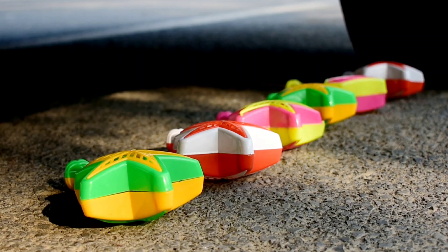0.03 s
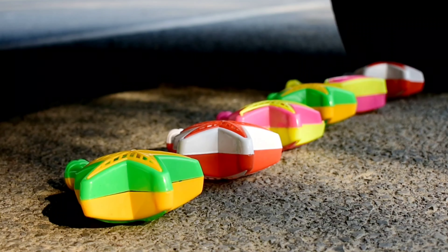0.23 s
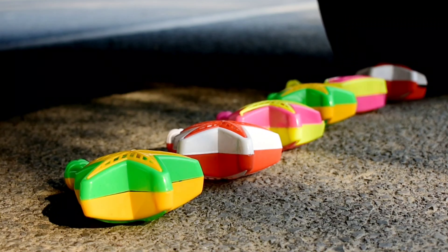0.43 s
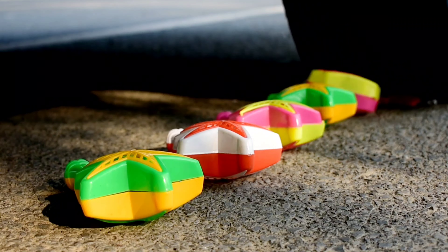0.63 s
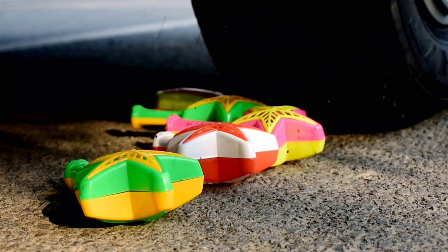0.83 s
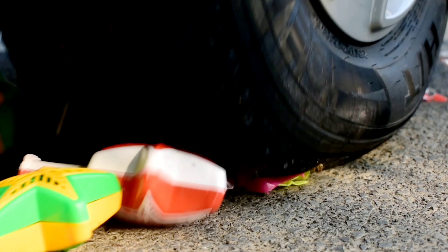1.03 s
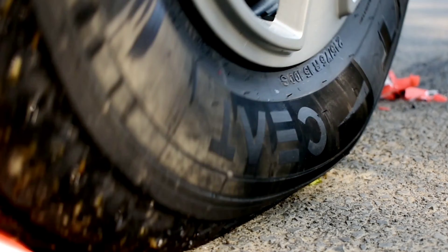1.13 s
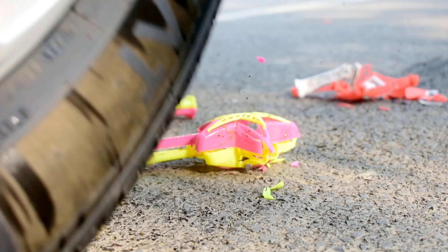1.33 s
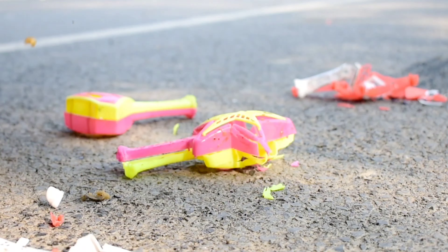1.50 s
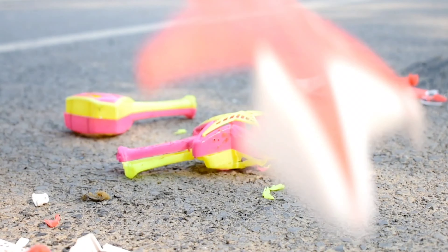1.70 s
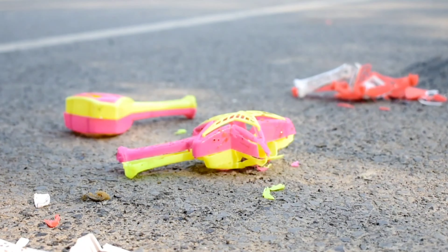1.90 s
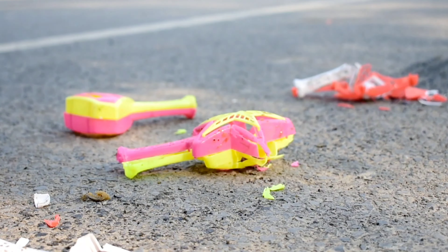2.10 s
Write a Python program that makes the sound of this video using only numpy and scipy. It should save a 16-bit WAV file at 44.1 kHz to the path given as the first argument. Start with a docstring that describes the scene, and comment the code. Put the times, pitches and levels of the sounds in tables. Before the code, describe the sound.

Hollow plastic toys crack and crunch sharply under a slow car tyre on asphalt, very close

```python
"""A car tyre rolls over a row of hollow plastic toy rattles on asphalt, close to the microphone.
Over faint outdoor noise, filtered and faded, the first shell snaps: torn, resonant clicks that crumble away.
Its shards twang and squeak (decaying and gliding sines); grinding ticks and ringing loose bits go on between cracks.
More shells crack, shedding crackling crumbs; later the flattened shells resound, and last the loose bits are jolted.
The road and car add a short diffuse echo; the loudest cracks overload the recorder."""
import sys
import numpy as np
from scipy import signal
from scipy.fft import rfft, irfft, next_fast_len
from scipy.io import wavfile
from scipy.ndimage import map_coordinates

SR = 44100
rng = np.random.default_rng(int(sys.argv[2]) if len(sys.argv) > 2 else 0)


def pcm_store(signal):
    """Save signal as 16-bit PCM."""
    levels = np.round(np.clip(np.atleast_2d(signal), -1, 1) * 32767)
    wavfile.write(sys.argv[1], SR, levels.astype(np.int16).T)


N = 94815


def amp(db):
    """Decibels to gain."""
    return 10 ** (np.asarray(db) / 20)


def unit(x):
    """Scale to rms 1."""
    return x / np.sqrt(np.mean(x ** 2) + 1e-20)


def along(points, hz):
    """Read (hz, value) points on a log frequency axis."""
    point_hz, value = np.transpose(points)
    return np.interp(np.log(hz + 1), np.log(point_hz + 1), value)


def curves(rows):
    """Interpolate each column after the time to one value per sample."""
    time_s, *columns = np.transpose(rows)
    return [np.interp(np.arange(N) / SR, time_s, column) for column in columns]


def seconds(size):
    """Time axis in seconds."""
    return np.arange(size) / SR


def grid(size=4096):
    """Frequencies in Hz, raised by 1 to avoid zero, on which short responses are drawn."""
    return np.fft.rfftfreq(size, 1 / SR) + 1


def causal(gain):
    """Minimum-phase impulse response: the sharpest click with this spectrum."""
    cepstrum = irfft(np.log(np.maximum(gain, 1e-6)))
    cepstrum[1:len(cepstrum) // 2] *= 2
    cepstrum[len(cepstrum) // 2 + 1:] = 0
    return irfft(np.exp(rfft(cepstrum)))


def coloured(x, points):
    """Filter x by a (hz, level_db) spectrum, at rms 1."""
    response = causal(amp(along(points, grid())))
    return unit(signal.fftconvolve(x, response)[:N])


def resonance(hz, q):
    """Spectrum of a broad peak, of unit power."""
    f = grid()
    return unit(1 / (1 + (q * (f / hz - hz / f)) ** 2))


def add(track, start_s, sound):
    """Mix a sound into the track at start_s."""
    part = track[max(round(start_s * SR), 0):][:len(sound)]
    part += sound[:len(part)]


def ticks(per_s):
    """Impulses of random size at random moments, per_s on average."""
    struck = rng.random(N) < per_s / SR
    return struck * rng.standard_normal(N)


def wobble(knots_per_s, size=N):
    """Smooth random curve through evenly spaced knots."""
    knots = rng.standard_normal(int(size * knots_per_s / SR) + 4)
    return map_coordinates(knots, [seconds(size) * knots_per_s])


# outdoor background spectrum: hz, level_db
AIR_SPECTRUM = [(25, -20.5), (220, -2.5), (320, -8), (800, -4.5), (2700, 3.5), (4000, -2), (6400, -26)]
# background level over time, added to AIR_DB: time_s, level_db
AIR_FADE = [(1.6, 2.5), (2.05, -5)]
AIR_DB = -61.5


def air():
    """Faint street noise: filtered Gaussian noise under a slow fade."""
    fade_db, = curves(AIR_FADE)
    return amp(AIR_DB + fade_db) * coloured(rng.standard_normal(N), AIR_SPECTRUM)


STREET_DB, STREET_DELAY_S, STREET_T60_S, STREET_DULL_HZ = -15, 0.0044, 0.1, 5000


def street(x):
    """Scatter off road and car underside: a short, dull tail of decaying noise."""
    t = seconds(SR // 4)
    tail = rng.standard_normal(len(t)) * amp(-60 * t / STREET_T60_S) * (t > STREET_DELAY_S)
    dull = causal(1 / (1 + (grid() / STREET_DULL_HZ) ** 2))
    response = signal.fftconvolve(tail / np.linalg.norm(tail), dull)
    return signal.fftconvolve(x, response)[:N]


# ringing notes of the loose bits: hz, level_db
BIT_NOTES = [(3150, 0), (3440, 6.5), (3560, -1.5), (3720, 0), (4380, -15.5)]
BIT_T60_S, BIT_ATTACK_S, BIT_SWING_DB = 0.039, 0.00086, 3
BIT_SPREAD, BIT_GLIDE_PER_S = 0.08, 1  # shares of the pitch, under full load


def chink(squeeze):
    """One knock of the loose bits, each note at a random strength; squeeze (0-1) scatters and bends the notes."""
    t = seconds(size=4096)
    hz, level_db = np.transpose(BIT_NOTES)[:, :, None]
    strength, detune, bend, turn = rng.standard_normal((4, len(BIT_NOTES), 1))
    hz = hz * (1 + squeeze * (BIT_SPREAD * detune + BIT_GLIDE_PER_S * bend * t))
    notes = amp(level_db + BIT_SWING_DB * strength) * np.sin(2 * np.pi * (hz * t + turn))
    envelope = amp(-60 * t / BIT_T60_S) * (1 - np.exp(-t / BIT_ATTACK_S)) ** 2
    return notes.sum(axis=0) * envelope / np.linalg.norm(amp(level_db))


CHATTER_PER_S = 190


def chatter(load):
    """Loose bits knock about at uneven moments, squeezed by the load (0-1)."""
    out = np.zeros(N)
    for slot, (when, size) in enumerate(rng.random((int(CHATTER_PER_S * N / SR), 2))):
        start_s = (slot + when) / CHATTER_PER_S
        squeeze = load[min(int(start_s * SR), N - 1)]
        add(out, start_s, (.5 + size) * chink(squeeze))
    return unit(out)


# pieces under the tread, before the trims below: time_s, grind_db, chatter_db
CRUSH = [(.28, -52.5, -38), (.36, -49.5, -44), (.41, -35, -30), (.53, -42, -31.5), (.58, -38, -27.5),
         (.625, -45, -38.5), (.66, -32.5, -32), (.74, -44, -40), (.8, -55.5, -42.5), (.94, -49, -45),
         (.985, -32.5, -34), (1.08, -50.5, -39), (1.17, -34, -42.5), (1.56, -46.5, -39.5), (1.72, -54, -44),
         (2.15, -73, -47.5)]
# grinding spectrum: hz, level_db
GRIND_SPECTRUM = [(300, -32.5), (1300, -18), (1750, -0.5), (3000, 0), (4300, -3), (5600, -16), (8000, -38)]
FIRST_BREAK_S, CRUSH_RISE_S = 0.19, .08
GRIND_TRIM_DB, GRIND_PER_S, CHATTER_TRIM_DB = -0.5, 1500, 1


def crushing():
    """The tread grinds pieces (dense filtered ticks) and the loose bits chatter between the cracks."""
    grind_db, chatter_db = curves(CRUSH)
    load = amp(grind_db - grind_db.max())
    begun = np.clip((seconds(N) - FIRST_BREAK_S) / CRUSH_RISE_S, 0, 1)
    grind = amp(grind_db + GRIND_TRIM_DB) * coloured(ticks(GRIND_PER_S), GRIND_SPECTRUM)
    return begun * (grind + amp(chatter_db + CHATTER_TRIM_DB) * chatter(load))


# loose bits jolted: start_s, level_db
JOLTS = [(0.427, -23), (1.435, -23.5), (1.614, -23), (1.926, -32), (2.065, -27.5), (2.095, -34)]


def jolts():
    """Single knocks of the loose bits, unsqueezed, so the notes hold their pitch."""
    out = np.zeros(N)
    for start_s, level_db in JOLTS:
        add(out, start_s, amp(level_db) * chink(0))
    return out


# crumb spectrum: hz, level_db
CRUMB_SPECTRUM = [(150, -21.5), (700, -0.5), (4300, 0), (7000, -24.5)]
# resonances of the flattened shells: hz, level_db
GROAN = [(220, -7.5), (430, -3.5), (740, 3)]
GROAN_DB, GROAN_Q = -8, 7.9  # level against the crumbs
GROAN_FROM_S = 1.11  # tyre on the nearest toys
CRUMB_DB, SPLINTER_DB = -23, -21  # against a crack's hollow_db and snap_db
DEBRIS_PER_S, DEBRIS_T60_S = 2500, 0.16


def debris():
    """Crumbling cracks shed crumbs and splinters (decaying crackle); the flattened shells resound to ticks."""
    power, t = np.zeros((2, N)), seconds(N)
    settle = amp(-60 * t / DEBRIS_T60_S) ** 2
    for start_s, hollow_db, *_, snap_db, share in CRACKS:
        for track, level_db in zip(power, (hollow_db, snap_db)):
            add(track, start_s, max(share, 0) * amp(level_db) ** 2 * settle)
    coarse, fine = np.sqrt(power)
    shells = causal(sum(amp(level_db) * resonance(hz, GROAN_Q) for hz, level_db in GROAN))
    groan = unit(signal.fftconvolve(ticks(DEBRIS_PER_S), shells)[:N])
    groan = amp(GROAN_DB) * groan * (t > GROAN_FROM_S)
    crumbs = coloured(ticks(DEBRIS_PER_S), CRUMB_SPECTRUM) + groan
    splinters = coloured(ticks(DEBRIS_PER_S), SNAP_SPECTRUM)
    return amp(CRUMB_DB) * coarse * crumbs + amp(SPLINTER_DB) * fine * splinters


# stressed plastic slipping: start_s, length_s, level_db, first_hz, last_hz
SQUEAKS = [(0.311, 0.063, -29.5, 3610, 3362), (0.554, 0.051, -26, 4050, 3500),
           (0.552, 0.052, -38, 1710, 1760), (0.565, .03, -25.5, 2837, 2680),
           (0.639, 0.035, -28.5, 2130, 2170)]
SQUEAK_WAVER, SQUEAK_WAVER_PER_S, SQUEAK_ROUGH_DB = 0.043, 710, 3  # waver: share of the pitch


def squeaks():
    """Plastic slips on plastic: a rough, wavering sine glides as the wall bends, starts at once and sinks away."""
    out = np.zeros(N)
    for start_s, length_s, level_db, first_hz, last_hz in SQUEAKS:
        waver, rough = (wobble(SQUEAK_WAVER_PER_S, size=4096) for _ in range(2))
        t = seconds(len(waver))
        progress = np.clip(t / length_s, 0, 1)
        hz = (first_hz + (last_hz - first_hz) * progress) * (1 + SQUEAK_WAVER * waver)
        envelope = np.sqrt(1 - progress) * (1 - np.exp(-t / BIT_ATTACK_S))
        level = amp(level_db + SQUEAK_ROUGH_DB * rough) * envelope
        add(out, start_s, level * np.sin(2 * np.pi * np.cumsum(hz) / SR))
    return out


# shells and shards set ringing, and single pings of the loose bits near 3.5 kHz; level before the attack:
# start_s, level_db, pitch_hz, t60_s
TWANGS = [(.2135, -23.5, 2700, 0.091), (.249, -16.5, 2690, 0.064), (.384, -14.5, 4040, 0.054),
          (.4495, -7, 3600, 0.014), (.454, -31.5, 370, 0.064), (0.4785, -9.5, 2680, 0.047),
          (.6683, -13.5, 3580, 0.036), (.6925, -12.5, 3480, 0.016)]
TWANG_ATTACK_S = 0.00056


def twangs():
    """A freed shard or a loose bit rings briefly on one note: a decaying sine."""
    out, t = np.zeros(N), seconds(size=6000)
    for start_s, level_db, pitch_hz, t60_s in TWANGS:
        envelope = amp(level_db - 60 * t / t60_s) * (1 - np.exp(-t / TWANG_ATTACK_S))
        add(out, start_s, envelope * np.sin(2 * np.pi * pitch_hz * t))
    return out


# shells breaking: start_s, hollow_db, hollow_hz, wall_db, wall_hz, thud_db, snap_db, crumbling_share
CRACKS = [(0.2125, -22.5, 2360, -19, 2940, -61, -41, 0.7), (0.2451, -3, 1940, -5, 3170, -19, -28, 0.29),
          (0.271, -34.5, 1170, -42, 2980, -37, -30, 0.2), (0.383, -14.5, 1880, -6.5, 4070, -29.5, -20, 1),
          (0.4032, -19.5, 2090, -18.5, 3960, -37, -33, 0.9), (0.4544, -10, 2060, -16, 4950, -25, -30, 0.5),
          (0.595, -33, 970, -35, 3330, -53, -44.5, 0.4), (0.6361, -18, 925, -12.5, 3520, -33, -49.5, 0.8),
          (0.684, -21.5, 1034, -15.5, 2740, -48, -52.5, 0.15),
          (0.7485, -6.5, 1127, -6, 3430, -18.5, -20, 0.02),
          (0.883, -9.5, 1860, -20.5, 3630, -18.5, -37, 0.16),
          (0.9505, -32, 1160, -23.5, 2080, -36.5, -51, 0.4),
          (0.9732, -32.5, 870, -19, 2500, -59, -36.5, 0.8),
          (0.9895, -25.5, 970, -7.5, 3100, -32, -19.5, 0.47),
          (1.0078, -9, 2160, -17, 2850, -63.5, -26.5, 0.7),
          (1.022, -20.5, 2340, -18.5, 3300, -71, -53, 0.65),
          (1.037, -33.5, 1190, -22.5, 3180, -64.5, -33, 0.23),
          (1.1149, -24, 1160, -16.5, 2540, -31, -23.5, 0.37),
          (1.1208, -18, 1410, -14.5, 2920, -33, -28.5, 0.19),
          (1.1454, -8.5, 1440, -12.5, 4000, -29.5, -18, 0.6), (1.156, -24, 1090, -17, 2890, -34.5, -34, 1),
          (1.1678, -14.5, 1090, -19, 2950, -22.5, -29.5, 0.3),
          (1.2053, -9.5, 2080, -10, 3270, -36, -24, 0.95),
          (1.2485, -17, 1980, -17.5, 4100, -39, -25.5, 0.48), (1.2749, -11.5, 1460, -14, 3620, -29, -23, 0),
          (1.2854, -14, 1530, -15, 3140, -28, -25.5, 0.7),
          (1.2961, -16, 1730, -20, 3000, -38.5, -41.5, 0.2),
          (1.3045, -34, 1660, -16, 2730, -45.5, -33, 0.5), (1.339, -18, 1820, -17, 2780, -30.5, -33.5, 0.4),
          (1.3877, -17.5, 1030, -11.5, 3080, -33.5, -34.5, 0.72),
          (1.4076, -11.5, 1230, -18.5, 3200, -18, -32.5, 0.44),
          (1.4665, -25.5, 1510, -37, 3430, -31, -33, 0.4), (1.483, -17, 1110, -21.5, 2020, -49.5, -39, 0.2),
          (1.5109, -12, 1860, -21.5, 3420, -42, -35, 0.44), (1.5197, -19, 1050, -18, 3250, -33.5, -55, 0.7),
          (1.5407, -17.5, 1500, -27, 3240, -57, -53, 0.4), (1.5467, -19.5, 1130, -19, 3150, -55, -33, 1),
          (1.5919, -24.5, 1070, -23.5, 3040, -55, -53.5, 0.57),
          (1.6333, -14.5, 1126, -13, 2780, -40.5, -48, 0.08), (1.707, -23, 986, -41, 3060, -78, -64, 0.52),
          (1.7671, -34, 910, -25.5, 2570, -70, -41, 0.5), (1.8738, -8.5, 1117, -14.5, 2760, -55, -38, 0.09),
          (1.911, -31.5, 1285, -29, 3010, -70, -59.5, 0.2)]
# the fracture itself: hz, level_db
SNAP_SPECTRUM = [(100, -32.5), (1000, 5), (4500, 5.5), (7000, -5.5), (10000, 5.5), (15000, 5.5),
                 (17000, -13.5)]
HOLLOW_Q, WALL_Q, THUD_HZ, THUD_Q = 2.01, 1.96, 610, 0.76
DULL_HZ = 5470  # the plastic hardly rings above this
TEAR_T60_S = 0.0043  # a fracture takes a moment to run
CRUMBLE_T60_S, CRUMBLE_WAIT_S, CRUMBLE_SPIKY = 0.032, .0006, 0.71
CLUMPS_PER_S, CLUMP_DB = 207, 2.5  # after-breaks come in clumps


def cracks():
    """A tearing fracture and a spray of tiny after-breaks excite the hollow and the wall of the toy."""
    out, t, f = np.zeros(N), seconds(size=2048), grid()
    millisecond = np.sqrt(SR / 1000)  # unit energy becomes rms 1 over 1 ms
    dull = 1 / np.sqrt(1 + (f / DULL_HZ) ** 10)
    snap = causal(unit(amp(along(SNAP_SPECTRUM, f))))
    thud = resonance(THUD_HZ, THUD_Q)
    for start_s, hollow_db, hollow_hz, wall_db, wall_hz, thud_db, snap_db, share in CRACKS:
        hollow = amp(hollow_db) * resonance(hollow_hz, HOLLOW_Q) * dull
        wall = amp(wall_db) * resonance(wall_hz, WALL_Q) * dull
        body = causal(np.linalg.norm([hollow, wall, amp(thud_db) * thud], axis=0))
        sizes, spikes, fibres = rng.standard_normal((3, len(t)))
        tear = signal.fftconvolve(snap, fibres * amp(-60 * t / TEAR_T60_S))[:len(snap)]
        click = body + amp(snap_db) * tear / np.linalg.norm(tear)
        clumps_db = CLUMP_DB * wobble(CLUMPS_PER_S, size=len(t))
        decay = amp(clumps_db - 60 * t / CRUMBLE_T60_S) * (t > CRUMBLE_WAIT_S)
        spray = sizes * np.exp(CRUMBLE_SPIKY * spikes) * decay
        crumble = signal.fftconvolve(click, spray)
        crumble *= np.linalg.norm(click) / np.linalg.norm(crumble)
        share = np.clip(share, .01, .95)  # of the energy
        add(out, start_s, millisecond * np.sqrt(1 - share) * click)
        add(out, start_s, millisecond * np.sqrt(share) * crumble)
    return out


def scene():
    """Mono sum of the background, the crushed pieces and the breaking toys with their short echo."""
    breaks = cracks() + twangs()
    background = air() + amp(STREET_DB) * street(breaks)
    pieces = crushing() + jolts() + debris() + squeaks()
    return (background + pieces + breaks)[None]


CEILING, CEILING_LOPSIDED, TOP_HZ = 0.65, 0.098, 16000


def record(dry):
    """The input saturates, a little unevenly on the two polarities, and keeps nothing from TOP_HZ up."""
    top = CEILING * (1 + CEILING_LOPSIDED * np.sign(dry))
    squashed = dry / (1 + np.abs(dry / top) ** 6) ** (1 / 6)
    size = next_fast_len(N + SR // 2)
    passed = np.fft.rfftfreq(size, 1 / SR) < TOP_HZ
    return irfft(rfft(squashed, size) * passed, size)[..., :N]


dry = scene()
out = record(dry)
pcm_store(out)
```